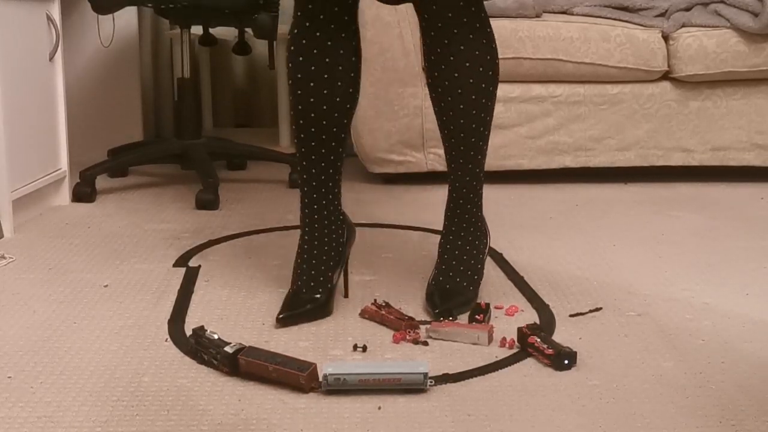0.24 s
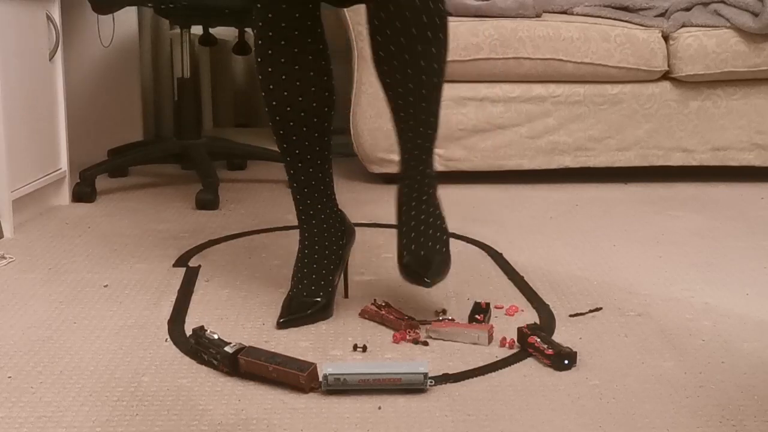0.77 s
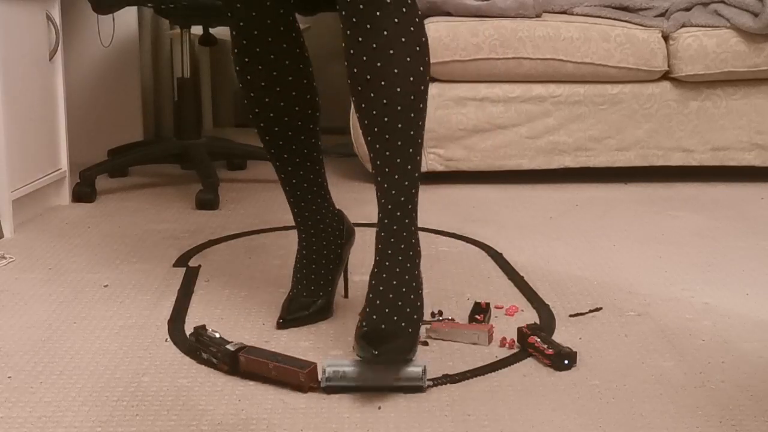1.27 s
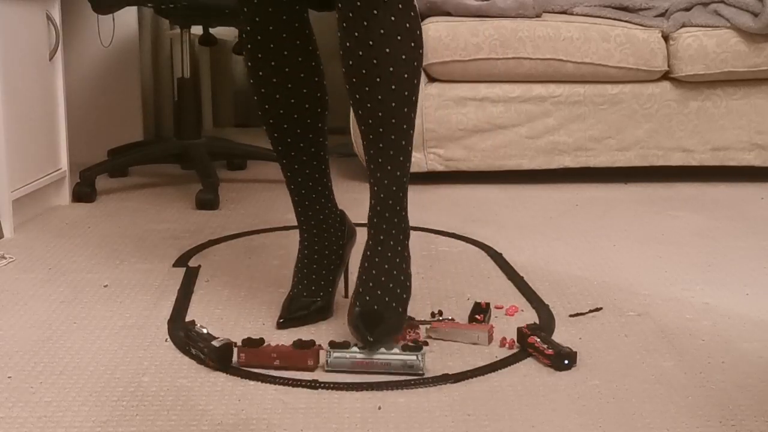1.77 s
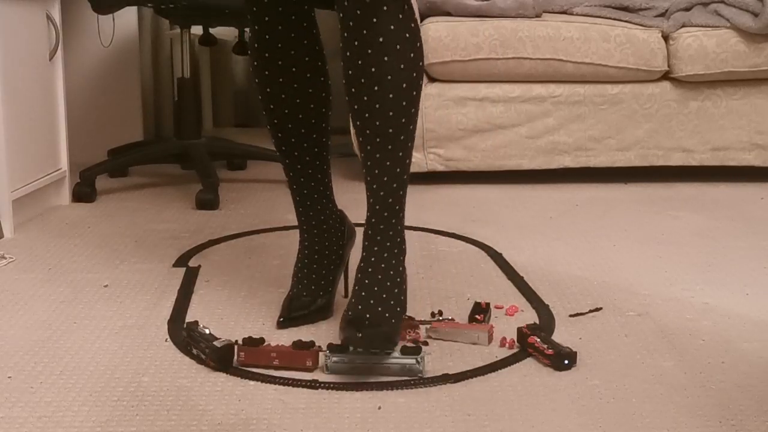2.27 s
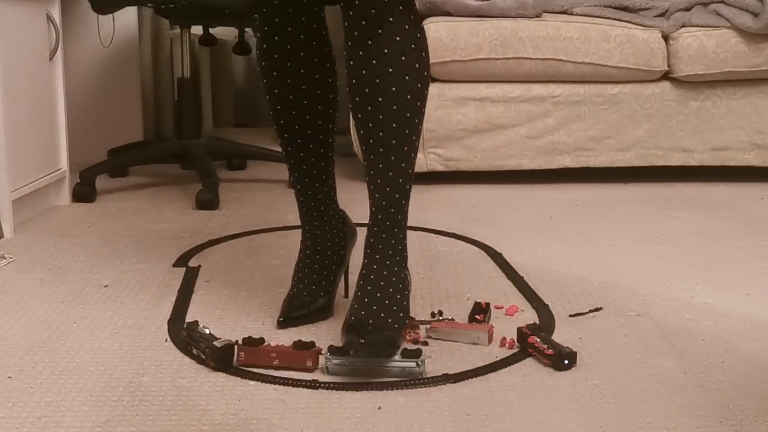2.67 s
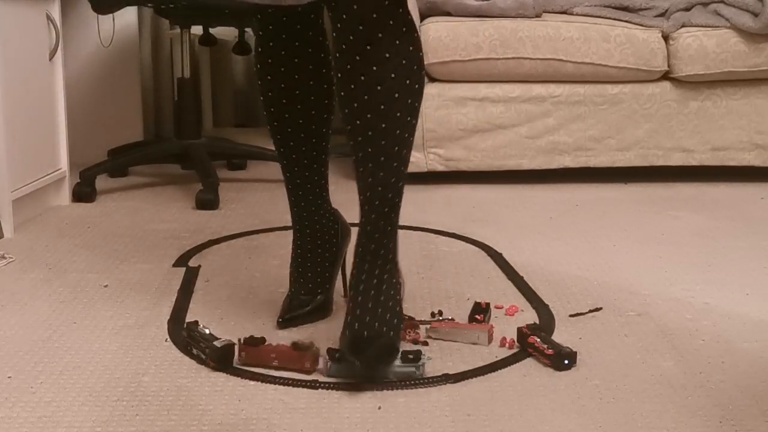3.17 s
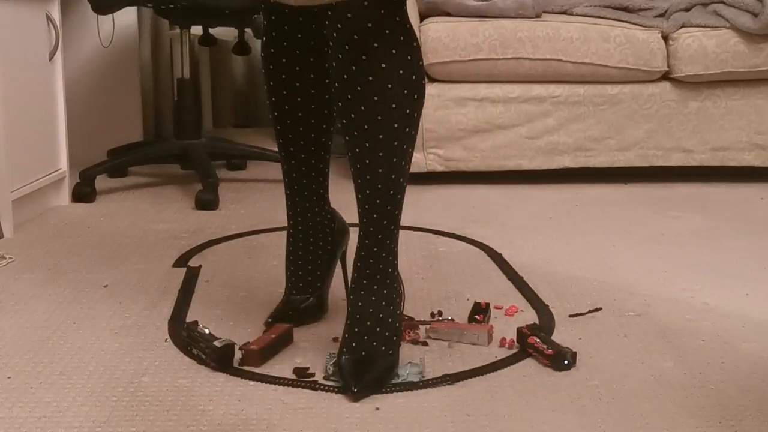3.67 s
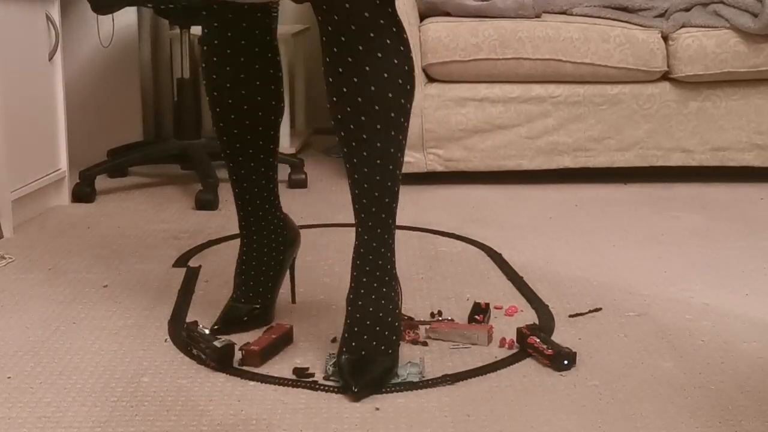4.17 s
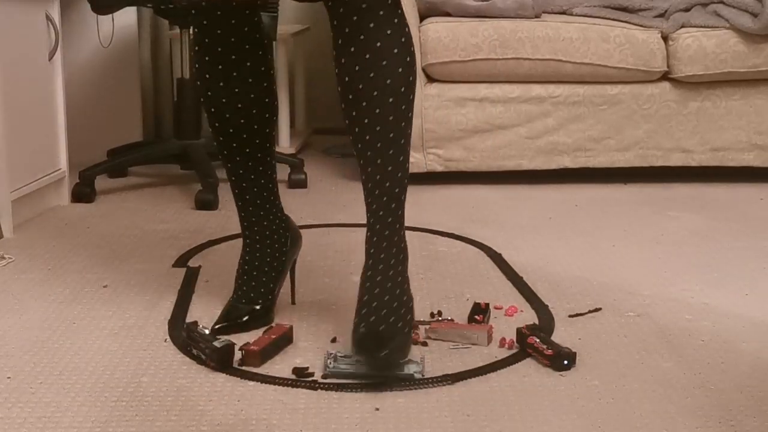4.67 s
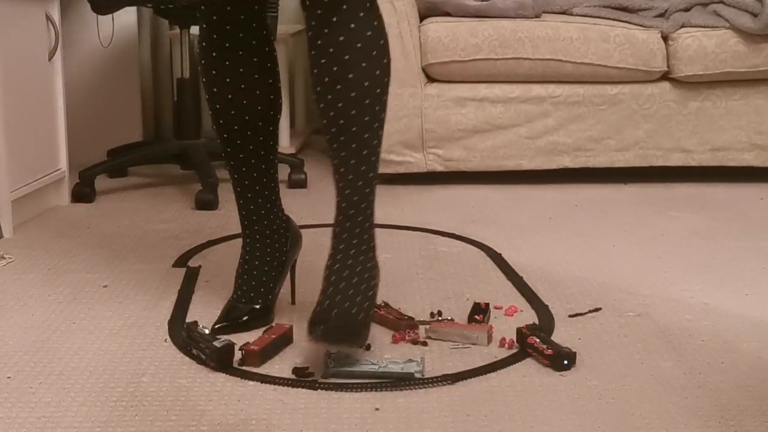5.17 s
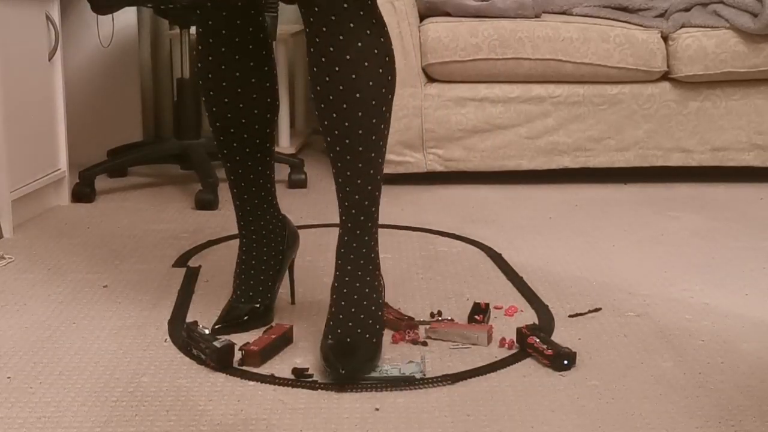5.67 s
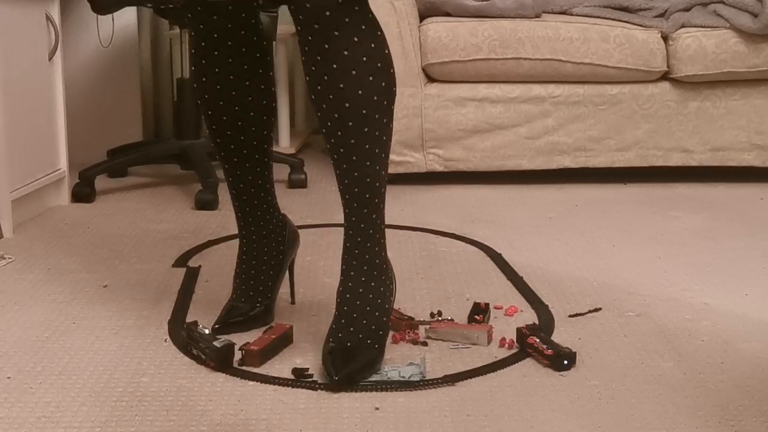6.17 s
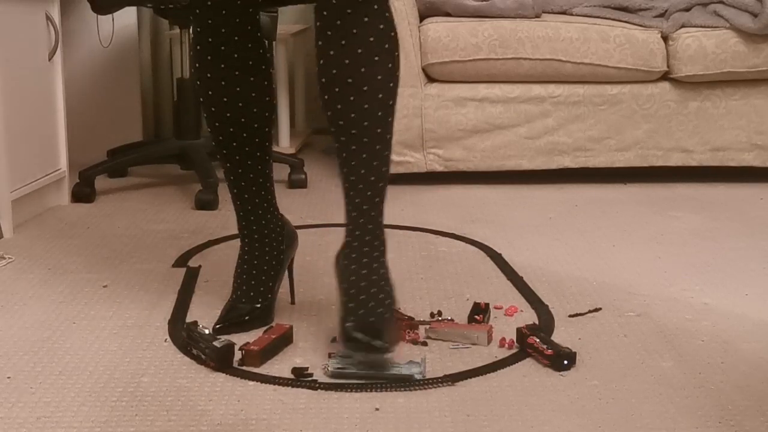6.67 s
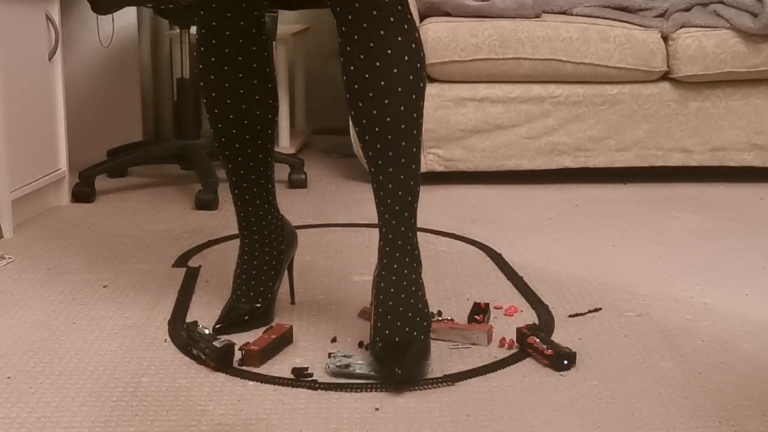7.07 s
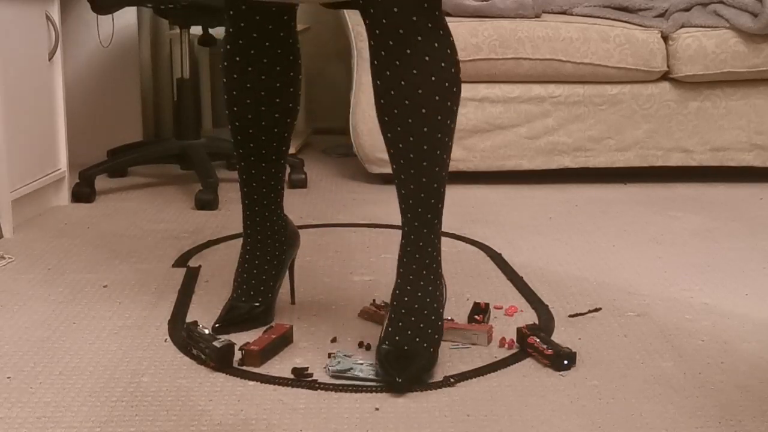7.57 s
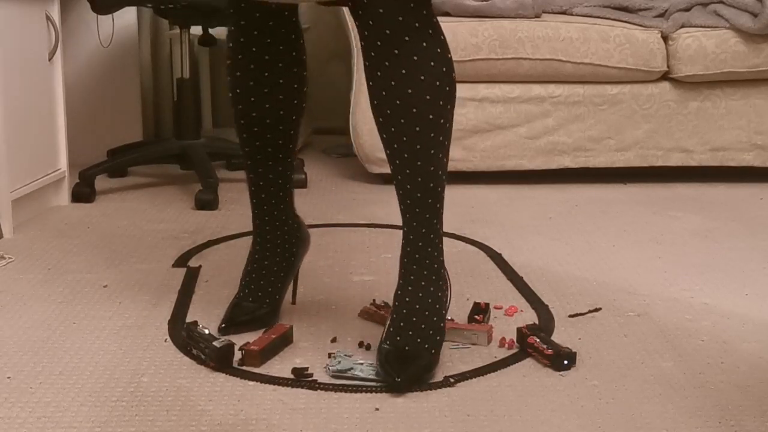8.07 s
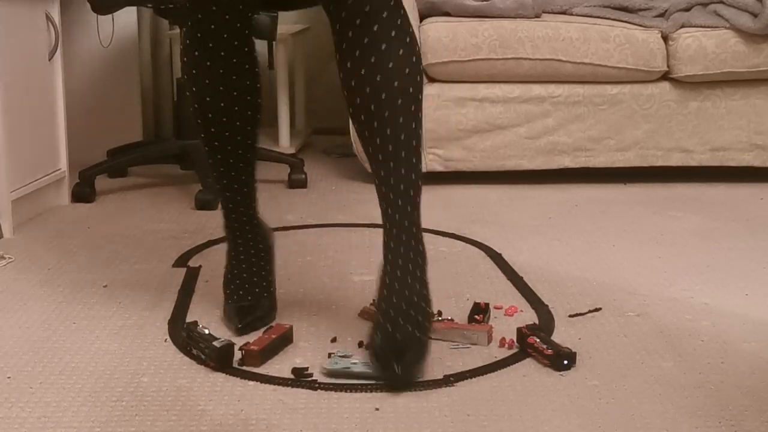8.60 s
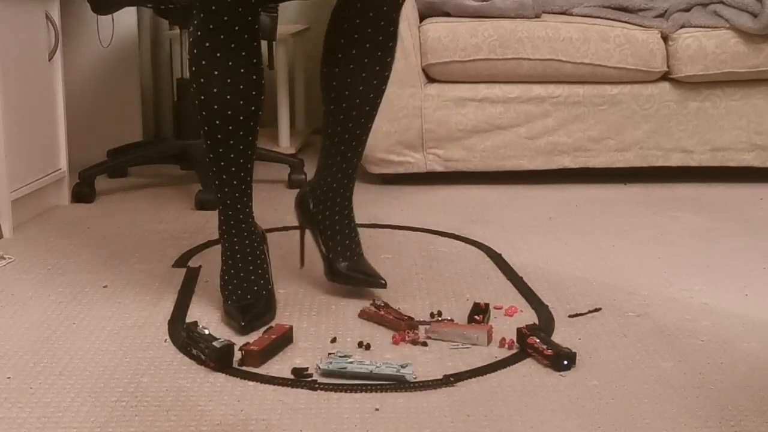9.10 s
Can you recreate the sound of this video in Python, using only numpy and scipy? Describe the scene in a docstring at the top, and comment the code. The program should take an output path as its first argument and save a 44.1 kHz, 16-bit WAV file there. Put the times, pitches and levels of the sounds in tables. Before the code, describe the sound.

A carpeted, furnished room with soft, wavering low hum and faint hiss, heard in stereo from about two metres. Faint plastic ticks open, with two dull knocks at 0.6 and 0.7 seconds. At 1.4-1.6 a cluster of cracks and a hollow thump sound as a carriage is stepped on, followed by tiny clicks, a barely audible squeak near 1.9 and a snap at 2.4. From 2.8 cracks build to a violent, splintering crunch at 3.1-3.3 with a low floor boom, then stray snaps to 3.7. Sparse small clicks follow until 5.3. Crisp cracks at 5.45 lead to a heavy hollow stamp at 5.9, with sharp snaps to 6.2. A quieter gap, then another crushing blow at 7.15, a very loud crack at 7.26 and crunching until 7.65. Light ticks return at 8.25, with brittle fragments clicking at 8.7 and 8.9 before near quiet.

```python
"""Furnished room, carpeted floor: heeled shoes crack and grind a hard plastic toy train, two metres from a two-port mic.
Snaps are short noise bursts in four bands, with shell modes and room tails; grinding is dense random crackle.
Loose fragments and debris ring as decaying sines; stick-slip ticks drive squeaks; noise-burst thumps are dull blows.
The floor booms as slow-rising low sines under weight shifts; hum is noise in room resonances, over faint hiss."""
import sys
import numpy as np
from scipy import signal
from scipy.fft import rfft, irfft, next_fast_len
from scipy.io import wavfile
from scipy.ndimage import uniform_filter1d

SR = 44100
rng = np.random.default_rng(int(sys.argv[2]) if len(sys.argv) > 2 else 0)


def to_linear_factor(level_db):
    """Convert decibel levels (scalar or array-like) to linear amplitude factors."""
    exponent = np.asarray(level_db, float) / 20
    return 10 ** exponent


def generate_wav(signal):
    """Clip the signal to [-1, 1] and save it as 16-bit WAV at the path in sys.argv[1]."""
    frames = np.transpose(np.atleast_2d(signal))
    scaled = np.clip(frames, -1, 1) * 32767
    pcm = np.round(scaled).astype(np.int16)
    wavfile.write(sys.argv[1], SR, pcm)


N = 411894

# room resonances (centre [Hz], width [Hz], relative level [dB])
HUM_RESONANCES = [(26.8, 9.8, -13.5), (65.4, 31, -25.5), (105.5, 3.8, -16), (139.4, 12.9, 0),
                  (176.1, 23, -5), (200, 48, -13.5), (255, 29, -12.5), (307, 18, -7), (344.6, 10.2, 1.5),
                  (402.4, 44, -2.5), (490, 70, -16.5), (767, 92, -21)]
# hum level (time [s], level [dB])
HUM_LEVELS = [(0, -44), (.2, -54.5), (2.3, -51), (3.3, -50), (3.55, -61), (3.8, -49.5), (4.151, -57.5),
              (4.349, -50.5), (6.2, -54), (6.45, -60.5), (6.903, -52), (8.6, -52.5), (9.05, -65.5),
              (9.34, -57)]
# hiss spectrum (frequency [Hz], relative density [dB per Hz])
HISS_SPECTRUM = [(280, -17), (480, -2), (653, -14.5), (768, -9.5), (1140, -17), (4950, -22), (7680, -28),
                 (10800, -24), (15700, -27), (15950, -69)]
HISS_LEFT_DB, HISS_RIGHT_DB = -73.5, -69.5
# microphone colour (frequency [Hz], gain [dB], left minus right [dB])
MIC_COLOUR = [(30, 1, 8), (100.7, 3.5, 1.5), (285, 2.5, 1), (746, -5.5, -6), (2840, 4, -3), (5000, 8, -1.5),
              (6800, 3.5, -8), (8100, -3.5, 6), (8800, 1.5, 4), (11400, -3, -13), (14800, -11, -7.5),
              (15750, -7, -7), (15950, -40, -0.5)]
RIGHT_LAG_SAMPLES = 2

# floor modes, thud then sway (frequency [Hz], t60 [s], rise [s])
FLOOR_MODES = [(99, 0.56, 0.014), (30.78, 0.88, 0.045)]
# weight landing on the floor (time [s], thud level [dB], sway level [dB])
WEIGHT_SHIFTS = [(1.499, -56, -54), (3.256, -38, -38.5), (3.449, -61.5, -45), (5.887, -45.5, -44),
                 (7.163, -55.5, -48), (3.621, -65, -43.5), (8.42, -79, -45)]
# heel landing on the floor with a dull thump (time [s], level [dB])
HEEL_THUMPS = [(.592, -19.5), (.729, -23), (1.51, -18.5), (3.113, -11.5), (3.259, -21), (3.665, -25.5),
               (5.888, -5.5), (6.034, -20.5), (6.217, -27), (7.16, -10.5), (7.493, -21)]
THUMP_LO_HZ, THUMP_HI_HZ, THUMP_DECAY_S = 392, 830, 0.02

# sole bearing down and grinding (full pressure from [s], crackle level [dB], held [s])
SOLE_PRESSES = [(.05, -70.5, 0.77), (1.25, -65.5, 0.16), (1.516, -37.5, 0.031), (1.7, -67, 0.33),
                (2.05, -69, 0.012), (2.381, -57, 0.047), (2.55, -70.5, 0.21), (2.93, -62.5, 0.035),
                (3.1, -59, 0.085), (3.31, -42, 0.11), (3.45, -55.5, 0.136), (4.05, -71, 0.31),
                (4.67, -58.5, 0.07), (4.785, -61.5, 0.0088), (5.48, -44, 0.019), (5.6, -67.5, 0.15),
                (5.92, -82, 0.21), (6.6, -62, 0.098), (7.098, -48, 0.06), (7.499, -48, 0.091),
                (8.29, -61.5, 0.22), (8.74, -53.5, 0.067)]
PRESS_RISE_DB_PER_S, PRESS_FALL_DB_PER_S = 210, 182.5
# one piece sliding against another (start [s], end [s], frequency [Hz], level [dB])
SLIDES = [(1.788, 2.063, 1765, -67.5), (1.798, 1.885, 1074, -67.5), (1.994, 2.054, 1430, -67),
          (1.94, 2.016, 12000, -50.5)]
# loose fragments singing when nudged (time [s], level [dB], frequency [Hz])
LOOSE_FRAGMENTS = [(0.591, -44, 5000), (0.7315, -33.5, 5000), (1.235, -61, 1930), (1.564, -22, 11400),
                   (1.814, -41, 11200), (2.151, -46, 5000), (2.326, -47, 5940), (2.372, -29, 11400),
                   (3.64, -27, 11700), (3.78, -48.5, 3010), (3.782, -55, 1480), (3.783, -49, 3330),
                   (4.166, -60, 2800), (4.164, -48.5, 4670), (4.374, -58, 1830), (4.376, -55, 2095),
                   (5.095, -63.5, 5330), (6.1128, -22.5, 6500), (6.797, -45, 4780), (6.801, -55.5, 2225),
                   (7.363, -40, 6500), (8.181, -64, 4930), (8.253, -44.5, 4870), (8.684, -27.5, 6800),
                   (8.753, -30.5, 12000), (8.897, -38.5, 4700)]
FRAGMENT_T60_S, SPLINTER_T60_S, SPLINTER_HZ = 0.03, 0.01, 4000  # thin splinters from this pitch up die sooner
PIECE_LO_HZ, PIECE_HI_HZ, PIECE_T60_S, PIECE_MODES = 801, 5000, 0.02, 7
PIECE_DB, PIECE_DB_PER_KNOCK_DB = -12.5, 0.71  # relative to the bite
DEBRIS_DB, DEBRIS_HI_HZ, DEBRIS_T60_S = -19.5, 5640, 0.008  # level relative to the crackle

# snaps, some of them a wall's echo about 12 ms after the snap before (time [s], bite level [dB], knock re bite
# [dB], splinter treble re bite [dB], left minus right [dB])
SNAP_EVENTS = [(0.0791, -49, -1, -1, 7), (0.169, -48, -14, 4.5, -6), (0.378, -37, -15, -26, -1),
               (0.5952, -32.5, 1, -30, -5), (0.729, -31.5, -2.5, -10, -2), (1.4001, -36, 1, -5.5, 2),
               (1.4702, -28.5, -3, -9, -13), (1.504, -25, -2, -7.5, 0), (1.512, -22, -2, -2, -3.5),
               (1.556, -28, 8.5, -2.5, -3), (1.567, -30, 1, -4, -16), (1.7642, -47.5, 11.5, 6, -3),
               (1.937, -52.5, -13, -1, -5), (2.151, -37.5, -7.5, -4.5, -3), (2.369, -29, -2.5, -5, -3),
               (2.6779, -50, 4, -3, -4), (2.8367, -23, -2.5, -1, -16), (2.9303, -19.5, -1, -5, -14),
               (2.976, -16.5, -6, -7.5, -13.5), (3.109, -26, -5, -1.5, -6.5), (3.1125, -19.5, -2.5, 1, -10),
               (3.131, -27, -4.5, -6, -6.5), (3.141, -23.5, 0, -4.5, -7), (3.18, -29, -4.5, -4.5, -5),
               (3.2591, -9.5, -0.5, -3.5, -9), (3.2653, -20, 5.5, -8.5, -3.5), (3.275, -25, -3, -9.5, -5),
               (3.286, -24, 2, 0, -5), (3.2959, -17.5, 6.5, 0, -5.5), (3.304, -22.5, -2, -12.5, -4),
               (3.47, -30.5, -2, -4, -10.5), (3.5132, -17, -27, -6, -13), (3.6395, -25.5, -12.5, -4, -5),
               (3.895, -49, 2.5, 3, 0.5), (3.978, -52, -3.5, -25, -19), (4.044, -49.5, -8, 7, 0),
               (4.1654, -47, -20, -3.5, -6), (4.252, -40.5, -17, -3.5, 8), (4.369, -40.5, -26, -13, 14),
               (4.5796, -31.5, 4, -3, -3), (4.769, -47.5, 3, 8.5, 8.5), (4.7743, -25, -41, -8, 5.5),
               (4.934, -40, -20, -5.5, 8), (5.317, -37.5, -12.5, -5, 4), (5.354, -34, -11, -9, 18),
               (5.452, -22.5, -13, 4, 3), (5.4612, -30.5, 9, -7, 2), (5.468, -23.5, -10.5, -6.5, 3),
               (5.486, -20, -44, 4, 0), (5.58, -28, -12, -3, -2.5), (5.678, -28.5, -17, -10, 11),
               (5.8889, -15, 0, -1, -3.5), (5.901, -31, -4.5, -5.5, -2), (6.034, -30.5, -3.5, 1.5, -3.5),
               (6.114, -14, -28, -8.5, -4), (6.218, -19.5, -19, -16, -21.5), (6.2293, -23.5, -57, -9, -8),
               (6.4665, -39, -19, -31, -1), (6.552, -36.5, -6, -2.5, -0.5), (6.797, -36.5, -22, -45, 2),
               (6.976, -32.5, -16.5, -3, 2), (7.108, -26, -53, -3, 0), (7.1585, -14.5, 0, -7, -1.5),
               (7.171, -24, 3.5, -17, -10.5), (7.256, -9, -18.5, -12.5, -11.5), (7.426, -16, -7, -5.5, -8),
               (7.4901, -20.5, -10, -8.5, -14), (7.4966, -19.5, -22.5, -22, -12),
               (7.5591, -32, -34, -0.5, -12.5), (7.6542, -27, -9, -8.5, -19), (8.245, -41, -5, -1, 2),
               (8.256, -35.5, -8.5, -6, 16), (8.334, -35, -5.5, -7, 20.5), (8.667, -36.5, -19, -40, 3),
               (8.6859, -21, -23, -8, 16), (8.6956, -33.5, -41, -24, 0), (8.884, -33.5, -6, -14, 8),
               (8.897, -34.5, 4, -37, 12)]
# body, knock, bite, splinter bands (low [Hz], high [Hz], gain [dB], burst decay [s], room t60 [s], room send [dB])
SNAP_BANDS = [(426, 737, 2, 0.0054, 0.48, -12), (840, 2630, 3.5, 0.0012, 0.33, -19.5),
              (2200, 9500, 2, 0.00088, 0.39, -24), (8700, 22000, 14.5, 0.0022, 0.29, -22)]
GRIND_DB = (-3.5, -6.0, -11.5, 1.0)  # crackle gain in each snap band
# plastic shell modes (frequency [Hz], relative level [dB], t60 [s])
SHELL_MODES = [(463, -2.5, 0.12), (564.5, 10.5, 0.11), (601, 9, 0.017), (820, 1.5, 0.013),
               (1442, -4, 0.021), (10500, 5, 0.0074)]
BODY_DB, BODY_DB_PER_KNOCK_DB = -12.5, 0.57  # more knock brings more hollow body
BURST_RISE_S = 0.00065


def shape(x, hz, db):
    """Colour by straight lines of dB over log frequency."""
    f = np.fft.rfftfreq(N, 1 / SR) + 1
    return irfft(rfft(x) * to_linear_factor(np.interp(np.log(f), np.log(hz), db)), N)


def unit(x):
    """Scale to rms 1."""
    return x / np.sqrt(np.mean(x ** 2))


def walk(rate_hz):
    """Random levels held 1 / rate_hz, then slewed twice."""
    hold = int(SR / rate_hz)
    steps = np.repeat(rng.standard_normal(N // hold + 1), hold)
    return 2.08 * uniform_filter1d(uniform_filter1d(steps, hold), hold)[:N]


def ring(x, hz, t60_s):
    """One decaying mode struck by x."""
    pole = np.exp((2j * np.pi * hz - np.log(1000) / t60_s) / SR)
    return signal.lfilter([1], [1, -pole], x).imag


def bandpass(lo_hz, hi_hz):
    """Second-order Butterworth band filter."""
    return signal.butter(2, [lo_hz, hi_hz], "bandpass", fs=SR, output="sos")


def add_at(out, start_s, sound):
    """Add one event in place."""
    out[int(start_s * SR):][:len(sound)] += sound


def room(x, t60_s, likeness):
    """Diffuse tail that builds up after the first reflection; partly alike at the two ports."""
    t = np.arange(int(0.6 * SR)) / SR
    mid, side = rng.standard_normal((2, len(t)))
    fade = np.clip((t - 0.004) / 0.006, 0, 1) * 1000 ** (-t / t60_s)
    # early reflections arrive in lumps before the tail evens out
    lumps = np.repeat(rng.standard_normal(len(t) // 90), 90)
    fade = fade * to_linear_factor(5 * np.exp(-t / 0.06) * lumps)
    tail = fade * (mid + np.sqrt(1 - likeness) * side * np.array([[1], [-1]]))
    tail = tail / np.sqrt(np.sum(fade ** 2)) * 5
    return signal.fftconvolve(x[None], tail, axes=1)[:, :N]


def hiss():
    """Independent coloured noise at each port."""
    noise = unit(shape(rng.standard_normal((2, N)), *np.transpose(HISS_SPECTRUM)))
    return noise * to_linear_factor([[HISS_LEFT_DB], [HISS_RIGHT_DB]])


def hum():
    """Noise in low room resonances, each wavering alone and all in lumps, nearly alike at both ports."""
    size = next_fast_len(N)
    f = np.fft.rfftfreq(size, 1 / SR) + 1
    groups = np.zeros((2, 2, N))  # deep or upper, port, sample
    lumps = walk(16)
    for hz, width_hz, db in HUM_RESONANCES:
        peak = 1 / (1 + ((f / hz - hz / f) * hz / width_hz) ** 2 / 2)
        mid, side = (irfft(rfft(rng.standard_normal(size)) * peak, size)[:N] for _ in range(2))
        ports = mid + 0.17 * side * np.array([[1], [-1]])
        groups[int(hz > 90)] += to_linear_factor(db + 2 * walk(7) + 2 * lumps) * ports
    deep, upper = groups / np.sqrt(np.mean(groups.sum(axis=0) ** 2))
    s, db = np.transpose(HUM_LEVELS)
    # the deepest resonances stay at the mean level while the rest swells
    return deep * to_linear_factor(db.mean()) + upper * to_linear_factor(np.interp(np.arange(N) / SR, s, db))


def floorboards():
    """Weight excites two low board modes that rise slowly and decay."""
    out, t = np.zeros(N + 2 * SR), np.arange(2 * SR) / SR
    for k, (hz, t60_s, rise_s) in enumerate(FLOOR_MODES):
        boom = (1 - np.exp(-t / rise_s)) ** 2 * 1000 ** (-t / t60_s) * np.sin(2 * np.pi * hz * t)
        for s, *db in WEIGHT_SHIFTS:
            add_at(out, s, to_linear_factor(db[k]) * boom)
    return out[:N]


def thumps():
    """Dull blows: decaying band noise that the room holds for a moment."""
    near, t = np.zeros(N + SR), np.arange(SR // 10) / SR
    for s, db in HEEL_THUMPS:
        add_at(near, s, to_linear_factor(db) * rng.standard_normal(len(t)) * np.exp(-t / THUMP_DECAY_S))
    near = signal.sosfilt(bandpass(THUMP_LO_HZ, THUMP_HI_HZ), near[:N])
    return near + to_linear_factor(-17.0) * room(near, 0.53, 0.38)


def squeak():
    """Quick uneven stick-slip ticks keep one thin mode singing while a piece slides."""
    t, out = np.arange(N) / SR, np.zeros(N)
    for start_s, end_s, hz, db in SLIDES:
        slips = (rng.random(N) < 100 / SR) * rng.standard_normal(N)  # 100 ticks per s on average
        sliding = np.clip(np.minimum(t - start_s, end_s - t) / 0.014, 0, 1)
        out += to_linear_factor(db) * sliding * unit(ring(slips, hz, 60 / hz))
    return out


def crackle(rate_hz=320, spread_db=3.8):
    """Random small fractures, few large and many small, following the pressure of the sole."""
    s, db, held_s = np.transpose(SOLE_PRESSES)[:, :, None]
    t = np.arange(0, N, 64) / SR
    rise_db = PRESS_RISE_DB_PER_S * np.clip(s - t, 0, None)
    fall_db = PRESS_FALL_DB_PER_S * np.clip(t - s - held_s, 0, None)
    pressure = to_linear_factor(db - rise_db - fall_db).sum(axis=0)
    hit, size, sign = rng.random((3, N))
    grains = (hit < rate_hz / SR) * to_linear_factor(-spread_db * np.log(size + 0.005)) * np.sign(sign - 0.5)
    return unit(grains) * np.interp(np.arange(N) / SR, t, pressure)


def debris():
    """Every ground bit gives one short ring at a pitch of its own."""
    bits, t = crackle(rate_hz=600, spread_db=2.8), np.arange(SR // 80) / SR
    at = np.flatnonzero(bits)[:, None]
    hz = PIECE_LO_HZ * (DEBRIS_HI_HZ / PIECE_LO_HZ) ** rng.random(at.shape)
    rings = to_linear_factor(DEBRIS_DB) * bits[at] * np.sin(2 * np.pi * hz * t) * 1000 ** (-t / DEBRIS_T60_S)
    return np.bincount((at + np.arange(len(t))).ravel(), rings.ravel(), N + SR)


def fragments():
    """Fragments, broken pieces, debris and squeaks ring in struck modes, near and through the room."""
    near, t = np.concatenate([squeak(), np.zeros(SR)]), np.arange(SR // 10) / SR
    for s, db, hz in LOOSE_FRAGMENTS:
        # two weaker neighbours widen the ring of an uneven piece
        modes = ((0.94, 0.35), (1, 1), (1.05, 0.35))
        cluster = sum(gain * np.sin(2 * np.pi * hz * ratio * t) for ratio, gain in modes)
        t60_s = FRAGMENT_T60_S if hz < SPLINTER_HZ else SPLINTER_T60_S
        add_at(near, s, to_linear_factor(db) * 1000 ** (-t / t60_s) * cluster)
    # every broken piece has a few modes of its own
    for s, bite_db, knock_db, _, _ in SNAP_EVENTS:
        pitch, strength = rng.random((2, PIECE_MODES, 1))
        hz = PIECE_LO_HZ * (PIECE_HI_HZ / PIECE_LO_HZ) ** pitch
        modes = strength * np.sin(2 * np.pi * hz * t) * 1000 ** (-t / PIECE_T60_S)
        level = to_linear_factor(bite_db + PIECE_DB + PIECE_DB_PER_KNOCK_DB * knock_db)
        add_at(near, s, level * modes.sum(axis=0))
    near = (near + debris())[:N]
    return near + to_linear_factor(-15.0) * room(near, 0.33, 0.054)


def plastic():
    """Snaps and crackle, band by band: direct burst, shell ring, room tail."""
    s, bite_db, knock_db, splinter_db, pan_db = np.transpose(SNAP_EVENTS)
    body_db = BODY_DB + BODY_DB_PER_KNOCK_DB * knock_db
    at, t, out = (s * SR).astype(int), np.arange(1024) / SR, np.zeros((2, N))
    shared = crackle()
    luck = rng.standard_normal((len(s), len(SHELL_MODES)))
    tear = np.sign(rng.standard_normal((len(s), len(t))))
    relative_db = (body_db, knock_db, 0 * s, splinter_db)
    for band, rel_db, grind_db in zip(SNAP_BANDS, relative_db, GRIND_DB):
        lo, hi, gain_db, decay_s, t60_s, room_db = band
        sos = bandpass(lo, hi)
        size = to_linear_factor(bite_db + rel_db + gain_db) * np.sqrt(SR / 2 / (hi - lo)) / 2
        click_gain = np.sqrt(decay_s * SR / 2)
        # some fractures are broad, others sound in one band only
        grind = to_linear_factor(grind_db) * (shared + crackle())
        envelope = (1 - np.exp(-t / BURST_RISE_S)) * np.exp(-t / decay_s)
        bursts, clicks = np.zeros((2, N + len(t))), np.zeros(N)
        for i, level, pan, noise in zip(at, size, pan_db, tear):
            burst = noise * envelope + 0.43 * click_gain * (t == 0)
            bursts[:, i:i + len(t)] += level * burst * to_linear_factor(np.array([[pan], [-pan]]) / 2)
        bursts = bursts[:, :N]
        # the walls hear a snap from all sides, which evens out its colour: add a plain click
        clicks[at] = size * click_gain
        near = signal.sosfilt(sos, bursts + grind)
        far = signal.sosfilt(sos, clicks + 0.6 * bursts.mean(axis=0) + grind)
        # every snap strikes the band's shell modes with its own chance strengths
        for (hz, db, ring_t60_s), chance in zip(SHELL_MODES, luck.T):
            if lo <= hz < hi:
                blows = np.zeros(N)
                blows[at] = to_linear_factor(bite_db + rel_db + db - 33.5 + 1.1 * chance)
                shell = ring(blows, hz, ring_t60_s)
                near, far = near + shell, far + shell
        out += near + to_linear_factor(room_db) * room(far, t60_s, np.clip(680 / hi, 0, 1))
    return out


def scene():
    """Hum, floor, thumps, fragments and breaking plastic."""
    return hum() + floorboards() + thumps() + fragments() + plastic()


def low_pass(x):
    """Removes everything above the highest recorded frequency."""
    return signal.sosfilt(signal.butter(12, 16950, fs=SR, output="sos"), x)


def record(dry):
    """The left port hears first; each port has its own colour and hiss."""
    hz, db, tilt_db = np.transpose(MIC_COLOUR)
    left = shape(dry[0], hz, db + tilt_db / 2)
    right = np.roll(shape(dry[1], hz, db - tilt_db / 2), RIGHT_LAG_SAMPLES)
    mix = np.tanh(np.array([left, right]) + hiss())  # rounds off the loudest snaps
    return low_pass(mix)


dry = scene()
out = record(dry)
generate_wav(out)
```